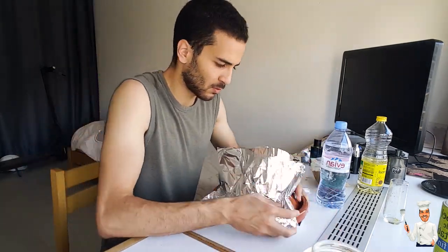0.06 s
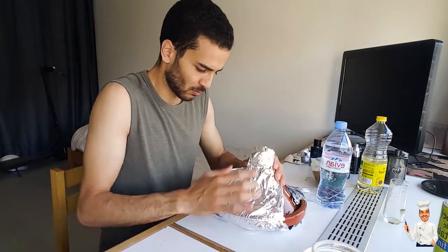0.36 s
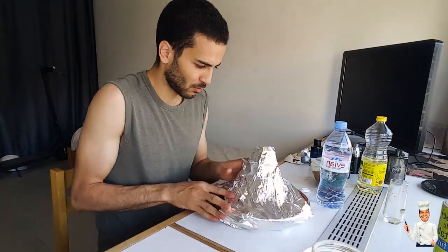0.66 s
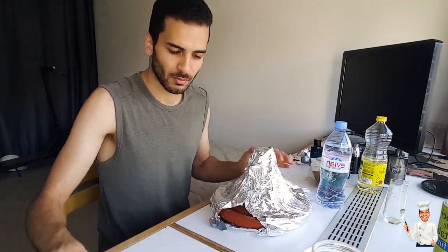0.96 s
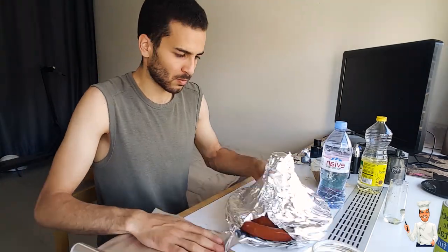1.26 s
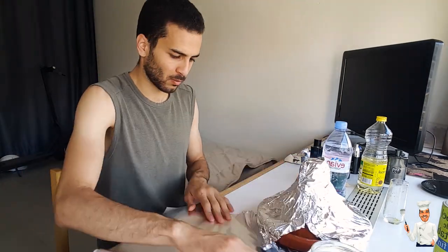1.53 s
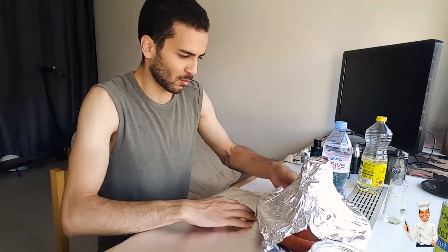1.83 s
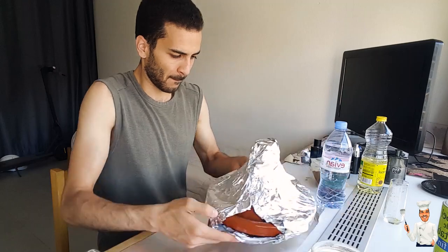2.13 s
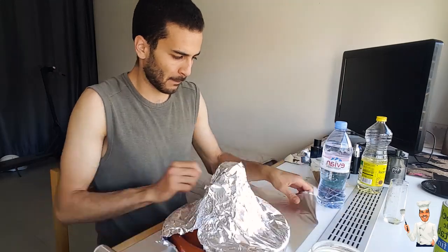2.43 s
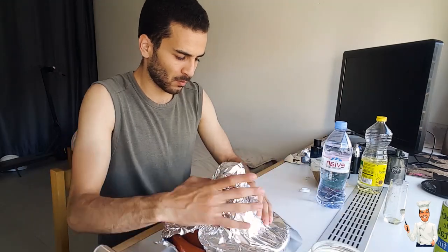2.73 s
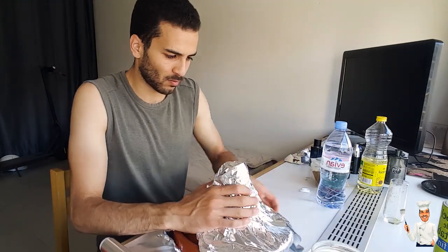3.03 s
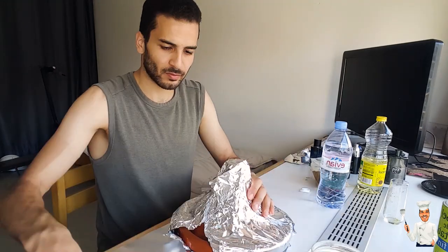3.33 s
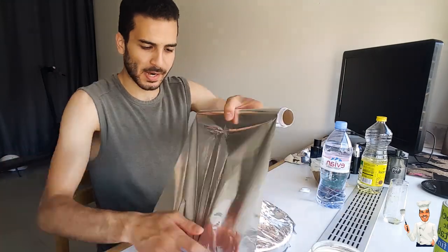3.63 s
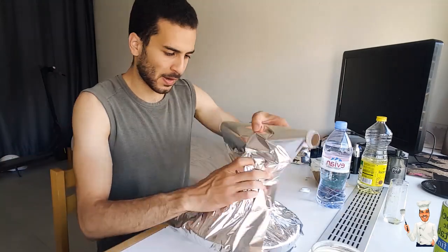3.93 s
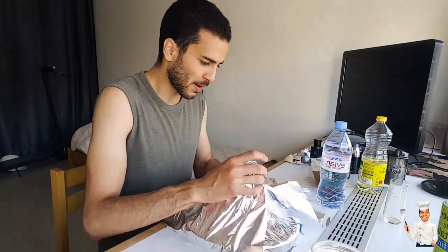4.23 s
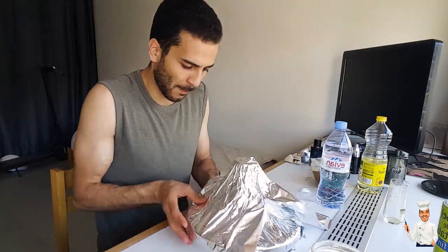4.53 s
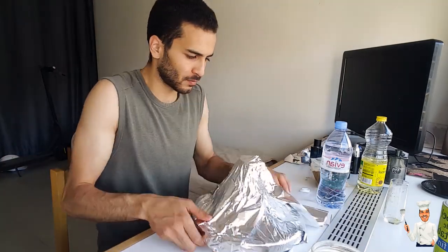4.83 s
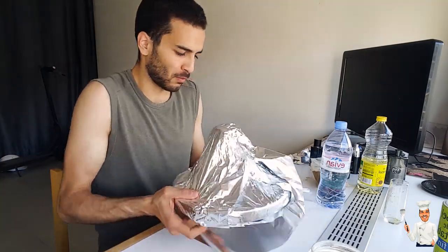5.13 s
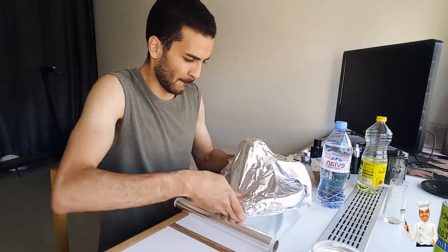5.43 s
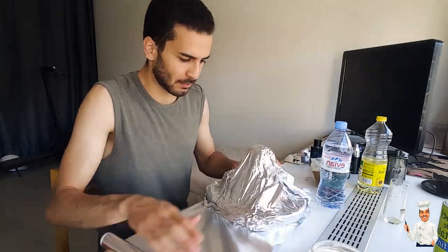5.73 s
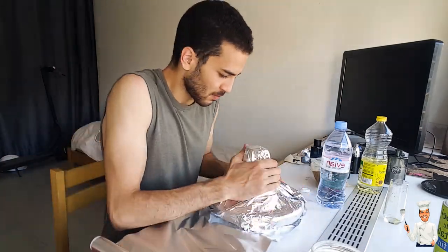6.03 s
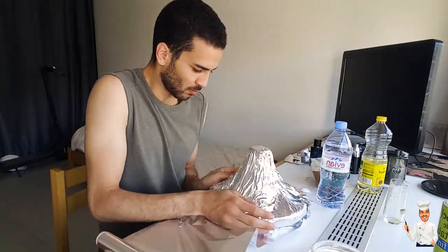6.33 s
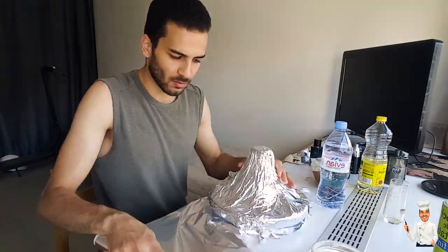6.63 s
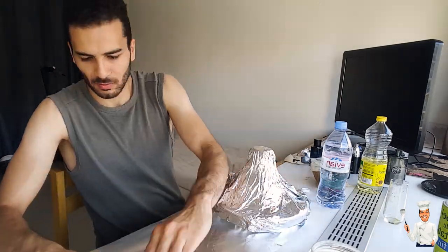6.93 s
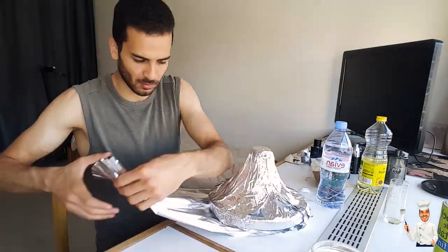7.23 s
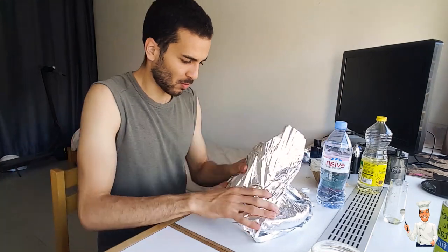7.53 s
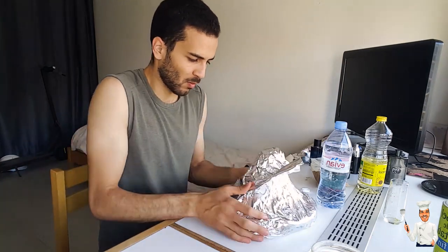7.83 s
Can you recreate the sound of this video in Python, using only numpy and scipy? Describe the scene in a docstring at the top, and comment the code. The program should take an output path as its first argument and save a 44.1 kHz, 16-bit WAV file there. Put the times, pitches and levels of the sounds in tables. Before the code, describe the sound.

Hands press aluminium foil around a clay pot, making bright crinkles and sharper snaps. After about a second, foil rasps briefly off its roll. Between presses, the pot and roll scrape over the table and knock down with a small rattle. Near the end the sheet squeaks, creaks and tears in quick jerks, then the crinkling continues. It is heard from nearby in stereo in a small, quiet room.

```python
"""A table in a small, quiet room, heard from nearby on a stereo microphone with two close ports.
From the start, hands press aluminium foil around a clay pot: it buckles in tiny clicks and louder snaps.
After a second, foil rasps off its roll. Between presses, pot and roll are shoved over the table top
and knock down on it with a brief rattle. Around seven seconds the taut sheet squeaks, creaks and is
torn off in jerks, and the pressing goes on to the end."""
import sys
import numpy as np
from scipy import signal
from scipy.fft import rfft, irfft, next_fast_len
from scipy.io import wavfile

SR = 44100
rng = np.random.default_rng(int(sys.argv[2]) if len(sys.argv) > 2 else 0)


def generate_wav(sig):
    """Save sig (samples, or channels by samples) to the path in sys.argv[1] as 16-bit PCM at SR."""
    pcm = np.round(np.clip(np.atleast_2d(sig).T, -1, 1) * 32767).astype(np.int16)
    wavfile.write(sys.argv[1], SR, pcm)


N = 347067
ATTACK = round(.014 * SR)  # samples over which the level of a blow or snap is set


def amp(db):
    """Decibels to gain."""
    return 10 ** (np.asarray(db) / 20)


def unit_rms(x, size=None):
    """Scales a stereo sound so that its centre has rms 1 (over the first size samples)."""
    return x / np.sqrt(np.mean(x.mean(0)[:size] ** 2) + 1e-20)


def unit_energy(x):
    """Scales a stereo response to unit energy at the centre."""
    return unit_rms(x) / np.sqrt(x.shape[1])


def read(points, hz):
    """Reads a table on a log-frequency axis."""
    table_hz, value = np.transpose(points)
    return np.interp(np.log(hz + 1), np.log(table_hz + 1), value)


def add(mix, start_s, sound):
    """Mixes a sound in at a time."""
    part = mix[..., max(round(start_s * SR), 0):][..., :sound.shape[-1]]
    part += sound[..., :part.shape[-1]]


def colour(x, spectrum, size=2048):
    """Causal filter with the given spectrum."""
    log_gain = np.log(amp(read(spectrum, abs(np.fft.fftfreq(size, 1 / SR)))))
    taps = np.fft.ifft(np.exp(np.conj(signal.hilbert(log_gain)))).real  # minimum phase
    return signal.oaconvolve(x, taps[None, :size // 2], axes=1)[:, :x.shape[1]]


def excite(force, response):
    """Plays a force through a stereo response scaled to unit energy."""
    return signal.oaconvolve(force[None], unit_energy(response), axes=1)[:, :N]


def clicks(per_s, spread_db):
    """Random train of clicks of mean power 1: many small, few large."""
    hits = rng.random(N) < per_s / SR
    train = hits * amp(spread_db * np.minimum(rng.exponential(1, N), 4))
    return train * rng.choice([-1, 1], N) / np.sqrt(np.mean(train ** 2) + 1e-20)


def avalanche(rise_s, fade_s, density, size=900):
    """One release sets off a quick, dying run of clicks; density is the share of samples that click."""
    t = np.arange(size) / SR
    run = rng.standard_normal(size) * (rng.random(size) < density)
    run *= (1 - np.exp(-t / rise_s)) * np.exp(-t / fade_s)
    return run * np.sqrt(ATTACK / np.sum(run ** 2))


def fits_and_starts(rate_hz, depth_db):
    """Random gain of mean power 1: things give way unevenly."""
    hz = np.fft.rfftfreq(N, 1 / SR)
    drift = irfft(rfft(rng.standard_normal(N)) / (1 + (hz / rate_hz) ** 4), N)
    gain = amp(depth_db * np.clip(drift / drift.std(), -2, 2))
    return gain / np.sqrt(np.mean(gain ** 2))


def strokes(rows, rise_s, release_s, growth_db=0):
    """Strength of hand movements: each rises, changes by growth_db, then falls 20 dB per release_s."""
    power = np.zeros(N)
    for start, length, db in rows:
        t = np.arange(0, length + 4 * release_s, 1 / SR)
        held_db = db + growth_db * np.minimum(t / length, 1)
        fall_db = 20 * np.maximum(t - length, 0) / release_s
        add(power, start, (np.minimum(t / rise_s, 1) * amp(held_db - fall_db)) ** 2)
    return np.sqrt(power)


# How alike the two ports hear the room. Each row: frequency in Hz, correlation (capped at 1 in use).
PORT_LIKENESS = [(60, 1), (300, 1.1), (700, 0.87), (1400, 1.1), (3100, 0.49), (6500, 0.09), (15000, 0.75)]
def diffuse(size):
    """Noise from all sides at two close ports: alike in the bass, less so in the treble."""
    common, separate = rfft(rng.standard_normal((2, size)))
    same = np.clip(read(PORT_LIKENESS, np.fft.rfftfreq(size, 1 / SR)), -1, 1)
    return irfft(np.array([common, same * common + np.sqrt(1 - same ** 2) * separate]), size)


# The empty room at the microphone. Each row: frequency in Hz, relative density in dB.
ROOM_TONE = [(20, 9), (60, -22.5), (150, -1.5), (300, -11.5), (490, 10.5), (700, -19), (1300, -7),
             (3000, -18), (8000, -15), (16000, -42)]
def room_tone():
    """Steady, low noise from all around the microphone."""
    return unit_rms(colour(diffuse(next_fast_len(N))[:, :N], ROOM_TONE))


# The small room's decay. Each row: frequency in Hz, seconds to fall 60 dB.
ROOM_DECAY = [(150, 0.65), (600, 0.22), (2500, 0.2), (8000, 0.2), (16000, 0.18)]
def room_tail(size=12000):
    """Dense reflections from the near walls, each band dying at its own speed."""
    hz, t, bands = signal.stft(diffuse(size), SR, nperseg=256)
    bands = bands * amp(-60 * t / read(ROOM_DECAY, hz)[:, None])
    tail = signal.istft(bands, SR, nperseg=256)[1][:, :size]
    onset = np.clip(np.arange(size) / SR / 0.0018, 0, 1) ** 2
    return unit_energy(tail * onset)


def table_ring(modes, favoured_hz=0, favour_db=8, reach_hz=55, vary_db=2, detune=0.0083, size=9000):
    """Dying modes of table and pot; every point of contact excites them differently."""
    t = np.arange(size) / SR
    hz, db, t60 = np.transpose(modes)[:, :, None]
    strength, shift, polarity, direction = rng.standard_normal((4, len(hz), 1))
    db = db + vary_db * strength + favour_db * np.exp(-((hz - favoured_hz) / reach_hz) ** 2)
    port_phase = np.arccos(np.clip(read(PORT_LIKENESS, hz), -1, 1)) * direction / 2
    phase = 2 * np.pi * hz * (1 + detune * shift) * t + np.pi * (polarity > 0)
    decay = amp(db - 60 * t / t60)
    ring = np.array([(decay * np.sin(phase + side * port_phase)).sum(0) for side in (-1, 1)])
    ring *= 1 - np.exp(-t / 0.00085)  # the ring starts softly, without a low thump
    radiation = signal.butter(3, .75 * hz.min(), "high", fs=SR, output="sos")
    return unit_energy(signal.sosfilt(radiation, ring))


# Contact with the table top. Each row: frequency in Hz, relative gain in dB.
CONTACT_SPECTRUM = [(60, -8), (140, -14), (250, -18.5), (450, -4.5), (1500, -2.5), (3000, -9), (16000, -28)]
# The ring of the sliding pot. Each row: frequency in Hz, relative level in dB, seconds to fall 60 dB.
SLIDE_MODES = [(208, -13, .15), (433, -12.5, 0.21), (487, 5.5, 0.064), (570, -18.5, 0.18),
               (690, 1.5, 0.046), (764, -2, 0.034), (851, 0, 0.035)]
# Pot and roll shoved over the table. Each row: start in seconds, length in seconds, level in dB.
SHOVES = [(0, 0.12, -51), (.98, 0.083, -41.5), (1.08, 0.048, -44), (1.19, 0.033, -49), (1.3, .14, -46.5),
          (1.54, 0.123, -45.5), (1.69, 0.067, -48.5), (1.92, 0.18, -51.5), (2.38, 0.087, -44),
          (3.14, 0.041, -43), (3.24, .15, -44.5), (4.2, 0.053, -55), (4.7, 0.16, -53), (4.91, 0.25, -48),
          (5.25, .45, -54), (5.97, 0.047, -53), (6.2, 0.13, -57), (6.73, 0.088, -55), (7.09, 0.11, -43),
          (7.33, 0.029, -55), (7.65, 0.056, -47.5), (7.765, 0.064, -41.5)]
def scrape():
    """Rough clay sticks and slips on the table, ringing softly."""
    slips = clicks(per_s=600, spread_db=2.5)
    slips *= strokes(SHOVES, rise_s=0.019, release_s=0.025, growth_db=0.5)
    slips *= fits_and_starts(rate_hz=18, depth_db=3.5)
    return excite(slips, colour(table_ring(SLIDE_MODES, vary_db=1.0), CONTACT_SPECTRUM))


def rattle(rebound_db=-8):
    """The force of a hard contact: one blow, then a quick run of small rebounds."""
    rebounds = avalanche(rise_s=0.0025, fade_s=0.012, density=.02, size=1500)
    force = amp(rebound_db) * rebounds / np.sqrt(ATTACK)
    force[0] += 1
    return force[None]


# The table with the pot on it. Each row: frequency in Hz, relative level in dB, seconds to fall 60 dB.
TABLE_MODES = [(349, -26.5, 0.078), (428.3, -6.5, 0.11), (498, 3, 0.071), (573, -5.5, 0.091),
               (642, -11.5, 0.063), (696.6, 0.5, 0.072), (750, 2, 0.05), (820, -5, 0.073), (891, 0, 0.076),
               (1162, 5, 0.11), (1331, 5, 0.065), (1534, 9, 0.032), (1653, 0.5, 0.11), (1898, 17, 0.023),
               (2170, 9.5, 0.041), (2445, 6, 0.075), (2764, 11.5, 0.019), (2910, -5.5, 0.058),
               (3586, 6, 0.03)]
# The dull thud and the clack of clay. Each row: frequency in Hz, relative density in dB.
THUD_SPECTRUM = [(20, -22.5), (70, -44), (130, -8.5), (210, 8.5), (310, 9.5), (450, -9.5), (900, -66.5)]
CLACK_SPECTRUM = [(500, -31.5), (1000, -8.5), (1300, -1), (2400, -9.5), (3700, -6), (5200, -11.5),
                  (8000, -13.5), (16000, -28)]
# Pot, roll and hands strike the table. Each row: start in seconds, level in dB, relative weight in dB,
# relative hardness in dB, frequency in Hz that the point of contact favours.
KNOCKS = [(0.765, -41.5, -19.5, -4, 740), (1.186, -42.5, -30, -23, 820), (1.332, -17.5, -31, -3, 720),
          (1.344, -21, -27, -2, 504), (1.355, -30, -14, -8, 480), (1.588, -39, -48, -21, 750),
          (1.613, -40, -38, -12, 477), (1.701, -47, -15, -9, 490), (1.813, -50, -16, -9, 820),
          (1.975, -44, -12, -4.5, 570), (2.377, -33.5, -10, -1, 527), (2.392, -37, -7, 0, 664),
          (2.421, -24, -22, -6.5, 458), (2.462, -42.5, -16, -21, 500), (2.822, -43.5, -13, -1, 504),
          (2.955, -50, -25, 1, 750), (3.256, -34.5, -38, -18, 475), (3.296, -37, -32, -6, 470),
          (3.348, -28.5, -33, -7.5, 470), (3.807, -41, -16, 0, 746), (3.888, -44.5, -26, 4, 730),
          (4.287, -21.5, -35, 0, 750), (4.355, -34.5, -21, -13, 855), (4.592, -43, -11, -4.5, 433),
          (4.963, -27, -14, -6.5, 493), (4.968, -20, -8.5, -7, 497), (5.196, -39, -9.5, -25, 480),
          (5.482, -16, -17.5, -3.5, 690), (5.497, -18.5, -40, -14, 690), (5.522, -19.5, -17.5, -4, 646),
          (5.639, -30, -28, -6, 442), (5.757, -44, -33, -18, 454), (6.149, -45.5, 3, -19, 430),
          (6.214, -40.5, -7, -22, 860), (6.268, -36.5, -10.5, -11, 750), (6.337, -34.5, -21, -18, 480),
          (6.664, -42.5, -27, -30, 504), (6.75, -22, -31, -6.5, 475)]
def knocks(thud_t60=0.069, clack_t60=0.076, contact_s=0.00038, flex_hz=65, flex_t60=.05, size=9000):
    """Each blow pushes, rings and flexes the table; a heavy one thuds, a hard one clacks."""
    t, out = np.arange(size) / SR, np.zeros((2, N))
    low_modes = [mode for mode in TABLE_MODES if mode[0] < 1000]
    high_modes = TABLE_MODES[len(low_modes):]
    pulse = np.ones((2, 1)) * (1 - t / contact_s) * np.exp(-t / contact_s)
    push = amp(-12) * unit_energy(colour(pulse, CONTACT_SPECTRUM))
    flex = amp(-35) * np.sin(2 * np.pi * flex_hz * t) * amp(-60 * t / flex_t60)
    for start, db, weight_db, hard_db, favoured_hz in KNOCKS:
        force = rattle()
        low_ring = signal.fftconvolve(table_ring(low_modes, favoured_hz) + push, force)[:, :size]
        body = unit_rms(low_ring, ATTACK) + flex
        thud = unit_rms(colour(diffuse(size) * amp(-60 * t / thud_t60), THUD_SPECTRUM), ATTACK)
        grit = unit_energy(colour(diffuse(size) * amp(-60 * t / clack_t60), CLACK_SPECTRUM))
        high_ring = signal.fftconvolve(table_ring(high_modes), force)[:, :size]
        # a short, strong contact reaches higher
        top_hz = np.clip(7500 * amp(hard_db + 0.44 * (db + 22.5)), 2300, 12000)
        softening = signal.butter(2, top_hz, fs=SR, output="sos")
        clack = unit_rms(signal.sosfilt(softening, high_ring + amp(-1) * grit), ATTACK)
        add(out, start, amp(db) * (body + amp(weight_db - 1) * thud + amp(hard_db) * clack))
    return out


def facet(ripple_db, sheet_db=5, room_db=-1, tick_t60=0.003, sheet_t60=0.055, size=12000):
    """One buckle of foil at the microphone: a tick, the shiver of the sheet around it, then the room."""
    t = np.arange(size) / SR
    tick = unit_energy(diffuse(size) * amp(-60 * t / tick_t60))
    shiver = unit_energy(diffuse(size) * amp(-60 * t / sheet_t60))
    hz = np.geomspace(1500, 16000, 18)
    ripple = np.transpose([hz, -ripple_db * rng.standard_normal(len(hz))])  # its own slight colour
    return colour(tick + amp(sheet_db) * shiver + amp(room_db) * room_tail(size), ripple)


# Foil squeaks. Each row: start and length in seconds, first and last pitch in Hz, level in dB.
SQUEAKS = [(1.414, 0.016, 10300, 9200, -36), (6.984, 0.016, 11000, 11660, -31.5),
           (6.992, 0.009, 10900, 9500, -31)]
def squeaks(waver=0.067, room_db=-3):
    """Foil sticks and slips on itself in short, unsteady glides."""
    direct = np.zeros(N)
    for start, length_s, start_hz, end_hz, db in SQUEAKS:
        size = round(length_s * SR)
        hz = np.linspace(start_hz, end_hz, size) * (1 + waver * rng.standard_normal(size))
        glide = np.sin(2 * np.pi * np.cumsum(hz) / SR)
        add(direct, start, amp(db) * 2 * np.hanning(size) * glide)
    return direct + amp(room_db) * excite(direct, room_tail())


# The colour of the creak. Each row: frequency in Hz, relative gain in dB.
CREAK_SPECTRUM = [(500, -17), (750, -9), (950, 9), (1400, -2), (1900, -15), (2400, -10), (4000, -37)]
# The sheet is pulled taut. Each row: start in seconds, length in seconds, level in dB.
CREAKS = [(7.098, .042, -39.5)]
def creak():
    """The stretched sheet slips on the roll."""
    slips = clicks(per_s=1700, spread_db=0)
    slips *= strokes(CREAKS, rise_s=0.008, release_s=0.017, growth_db=-4)
    return excite(slips, colour(facet(ripple_db=1, sheet_db=-2, room_db=-4), CREAK_SPECTRUM))


# The rasp of peeling foil. Each row: frequency in Hz, relative gain in dB.
RASP_SPECTRUM = [(900, -27), (1700, -11), (2300, 5.5), (3300, 2.5), (4400, -1.5), (7000, -1.5), (11000, -7),
                 (16000, -33)]
# Foil is pulled off the roll. Each row: start in seconds, length in seconds, level in dB.
PULLS = [(1.03, 0.029, -43.5), (1.07, 0.045, -52), (1.187, 0.032, -44), (1.415, .025, -54),
         (1.522, 0.0082, -39.5), (1.572, 0.036, -32.5)]
def unroll():
    """The sheet peels from the roll in a fast run of tiny releases."""
    peel = clicks(per_s=3300, spread_db=10)
    peel *= strokes(PULLS, rise_s=0.0091, release_s=0.011, growth_db=2)
    return excite(peel, colour(facet(ripple_db=0.5), RASP_SPECTRUM))


# The colour of tearing foil. Each row: frequency in Hz, relative gain in dB.
TEAR_SPECTRUM = [(200, -32), (480, 2), (1000, -8), (1500, -0.5), (3600, 1.5), (5200, 1.5), (7000, -0.5),
                 (16000, -1.5)]
# The jerks of the tear. Each row: start in seconds, level in dB, fade time in seconds.
TEAR_JERKS = [(6.9725, -37, 0.001), (7.1517, -21, 0.0015), (7.154, -27, 0.0035), (7.159, -27, 0.0045),
              (7.177, -26.5, .0012), (7.188, -34, 0.0013), (7.1976, -25.5, 0.0019)]
def tear():
    """Each jerk of the tear cracks the taut sheet."""
    force = np.zeros(N)
    for start, db, fade_s in TEAR_JERKS:
        add(force, start, amp(db) * avalanche(rise_s=.0001, fade_s=fade_s, density=.25))
    return excite(force, colour(facet(ripple_db=0, sheet_db=-3, room_db=-4), TEAR_SPECTRUM))


# Small facets sizzle and broad panels flap. Each row: frequency in Hz, relative gain in dB.
SIZZLE_SPECTRUM = [(1500, -35), (3200, -5.5), (4600, -3), (7000, 1), (10000, 0.5), (13000, 0),
                   (16000, -6.5)]
FLAP_SPECTRUM = [(60, -35), (130, -16), (210, -7.5), (320, -7.5), (470, 2), (590, -1.5), (760, 6.5),
                 (1030, -9), (1230, 1.5), (1500, -2), (2600, 3.5), (3800, 2.5), (5500, -7), (10000, -43.5)]
# Hands press and smooth the foil on the pot. Each row: start in seconds, length in seconds,
# sizzle drive in dB, flap drive in dB over the sizzle drive.
PRESSES = [(-0.01, 0.019, -42, -3), (0.048, 0.33, -43, -5.5), (0.426, 0.11, -49.5, -7),
           (0.508, 0.12, -42, -7), (0.668, .2, -49.5, -6.5), (0.946, .2, -68, 7), (1.027, 0.029, -50, 4.5),
           (1.178, 0.067, -52, 0.5), (1.278, .04, -46, 1), (1.309, 0.054, -39, 3),
           (1.381, 0.086, -56.5, 10), (1.508, .1, -45, -0.5), (1.672, 0.24, -58.5, -3),
           (1.893, 0.098, -53, -0.5), (2.106, .25, -58, -5), (2.365, 0.06, -49, 2.5),
           (2.483, .07, -46.5, -8), (2.558, 0.15, -40.5, -4.5), (2.715, .29, -42, -7.5),
           (3.067, 0.21, -48, -4), (3.295, .09, -56.5, -5), (3.387, 0.28, -43.5, -5),
           (3.58, 0.21, -41, -6.5), (3.81, 0.35, -40, -4), (4.188, 0.19, -42, -2.5),
           (4.458, .235, -40, -6.5), (4.717, 0.094, -43.5, -7.5), (4.855, .13, -43, -3.5),
           (4.997, 0.15, -42, 0), (5.18, .305, -47, -4), (5.462, 0.079, -43.5, 2), (5.6, .17, -51, -7),
           (5.768, 0.73, -45.5, -6.5), (6.537, 0.056, -41.5, -9.5), (6.629, 0.13, -50.5, -3.5),
           (6.766, .11, -63, 0), (6.969, 0.087, -42.5, -3), (7.09, 0.26, -49.5, -6.5),
           (7.297, 0.3, -42, -5), (7.64, 0.27, -45, -6)]
# Creases give way at once. Each row: start in seconds, relative sizzle drive in dB, flap in dB over it.
SNAPS = [(.04, -39.5, -4), (.103, -40.5, -8), (.209, -42, 1), (0.235, -37.5, -5.5), (.423, -39, -0.5),
         (.798, -41, -6), (.958, -61.5, -9), (1.42, -36.5, -0.5), (2.047, -57, -0.5), (2.123, -55.5, -1),
         (2.161, -52.5, -2), (2.212, -51, -6), (2.554, -42, -5.5), (2.673, -42.5, -5), (2.82, -37, -6),
         (3.06, -42.5, -4.5), (3.109, -42.5, -6.5), (3.152, -40.5, -3.5), (3.406, -42.5, -16),
         (3.698, -44, -6), (3.742, -37.5, -3), (3.805, -36, -4), (3.887, -39.5, -6), (3.974, -38, 1),
         (4.351, -37, -3), (4.439, -40.5, -4), (4.503, -46, -5), (4.597, -45.5, -3.5), (4.759, -40, -6.5),
         (5.348, -48, -1), (5.592, -37.5, -3.5), (5.826, -37.5, -4.5), (5.909, -37.5, -6.5),
         (5.93, -44.5, 0), (5.994, -42, -3.5), (6.044, -41.5, -4.5), (6.144, -43, -5), (6.21, -43, -6),
         (6.267, -42, -5), (6.338, -39, -4.5), (6.456, -42.5, -4.5), (6.555, -40.5, -7), (6.696, -36, -6),
         (6.857, -57.5, 7.5), (6.999, -37, -10), (7.012, -34.5, -6.5), (7.57, -42.5, 2.5),
         (7.662, -42, -1.5), (7.819, -41.5, -3.5)]
def crinkle(sizzle_db=1.5, flap_db=1.0, snap_db=3.0, hops_per_s=220, facets=10):
    """Pressed foil buckles, hopping from facet to facet; each sizzles and shakes the panels next to it."""
    starts, lengths, levels_db, panels_db = np.transpose(PRESSES)
    buckles = clicks(per_s=3000, spread_db=5) * fits_and_starts(rate_hz=45, depth_db=1.62)
    pressure = [strokes(zip(starts, lengths, db), rise_s=0.013, release_s=0.047)
                for db in (levels_db, levels_db + panels_db)]
    drives = buckles * np.array(pressure)  # sizzle, flap
    for start, db, panel_db in SNAPS:
        snap = avalanche(rise_s=0.0003, fade_s=0.0072, density=.07)
        add(drives, start, amp(db + snap_db) * amp([[0], [panel_db]]) * snap)
    route = rng.integers(0, facets, N)
    active_facet = route[np.cumsum(rng.random(N) < hops_per_s / SR)]
    out = np.zeros((2, N))
    for k in range(facets):
        response = facet(ripple_db=0.03)
        for drive, spectrum, db in zip(drives, (SIZZLE_SPECTRUM, FLAP_SPECTRUM), (sizzle_db, flap_db)):
            out += amp(db) * excite(drive * (active_facet == k), colour(response, spectrum))
    return out


def scene(echo_db=-21, room_tone_db=-64):
    """What reaches the microphone: the table with its faint reverberation, the quiet room, the foil."""
    table = knocks() + scrape()
    echo = amp(echo_db) * excite(table.mean(0), room_tail())
    background = amp(room_tone_db) * room_tone()
    foil = crinkle() + unroll() + creak() + tear() + squeaks()
    return background + echo + table + foil


# The balance of the microphone's ports. Each row: frequency in Hz, left over right in dB.
PORT_BALANCE = [(60, -0.5), (200, 3.5), (650, -0.2), (1290, 4), (2400, 0.5), (4400, 0), (8100, -2.5),
                (15000, -9)]
def record(dry, left_late_s=.00003, band_limit_hz=16200):
    """The microphone: its right port hears the sound first and with more treble; both are band-limited."""
    size = next_fast_len(N + 2048)
    hz = np.fft.rfftfreq(size, 1 / SR)
    lean_db = read(PORT_BALANCE, hz) / 2
    delay = np.exp(-2j * np.pi * hz * left_late_s)
    port_gains = np.array([amp(lean_db) * delay, amp(-lean_db)])
    ports = irfft(rfft(dry, size) * port_gains, size)[:, :N]
    lowpass = signal.firwin(401, band_limit_hz, window=("kaiser", 9), fs=SR)
    return signal.oaconvolve(ports, lowpass[None], "same", axes=1)


dry = scene()
out = record(dry)
generate_wav(out)
```